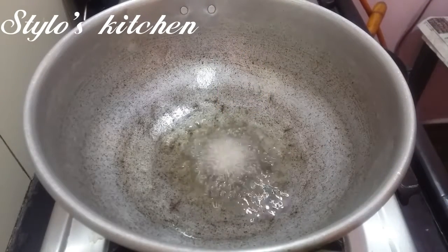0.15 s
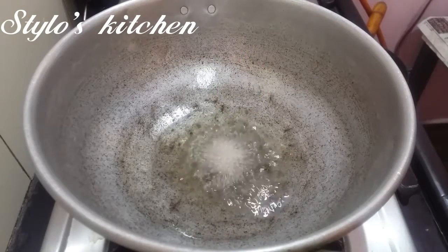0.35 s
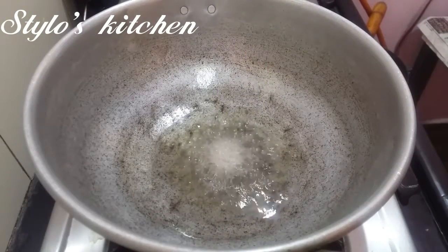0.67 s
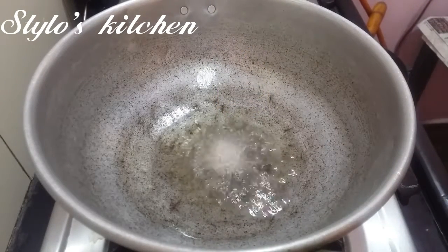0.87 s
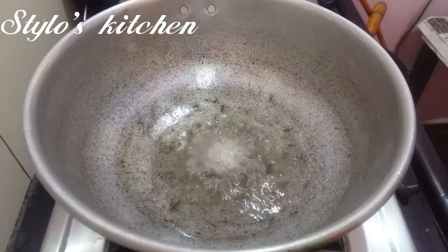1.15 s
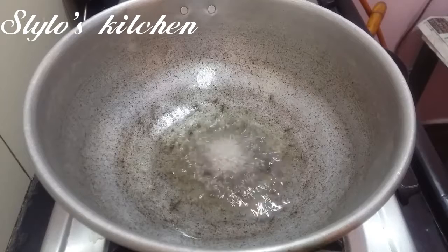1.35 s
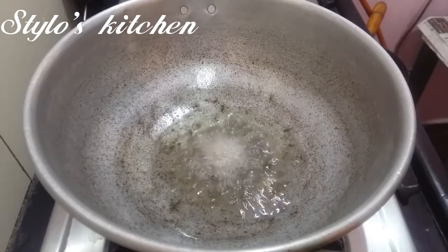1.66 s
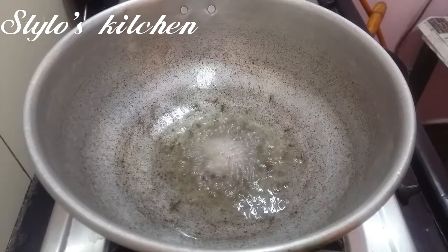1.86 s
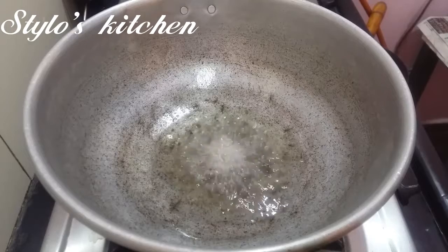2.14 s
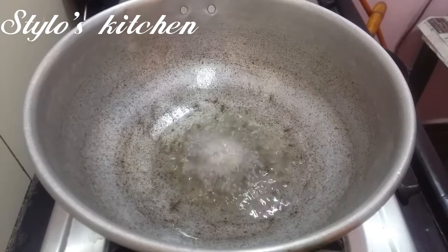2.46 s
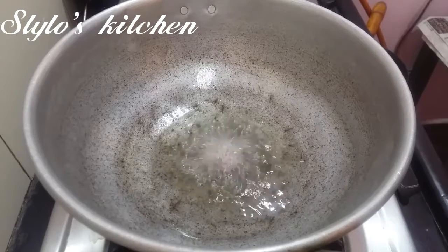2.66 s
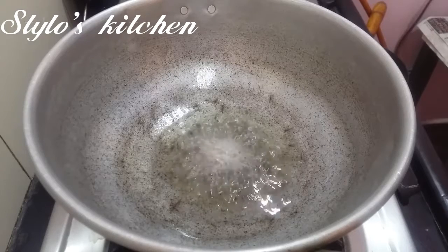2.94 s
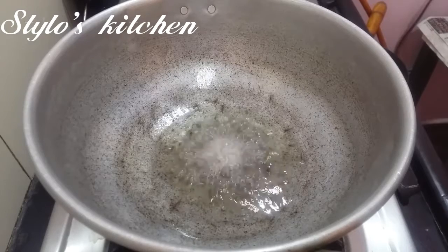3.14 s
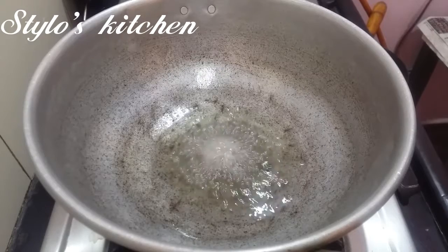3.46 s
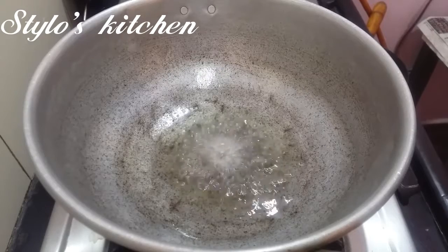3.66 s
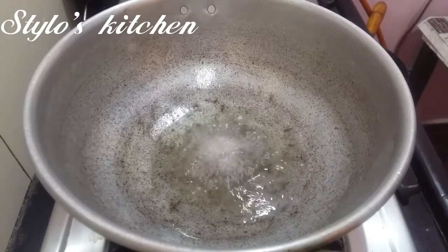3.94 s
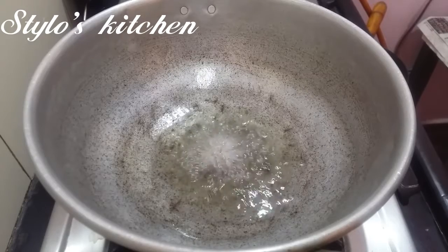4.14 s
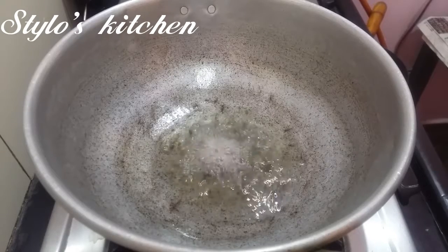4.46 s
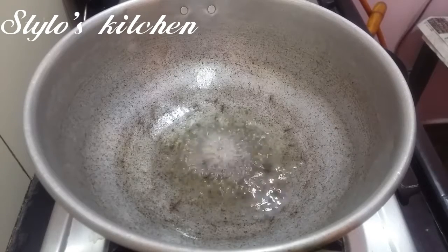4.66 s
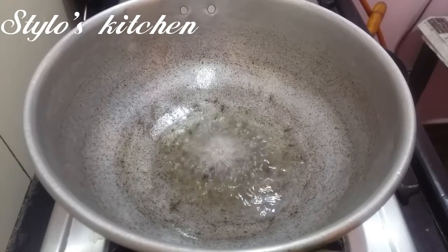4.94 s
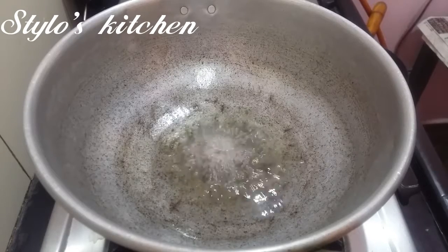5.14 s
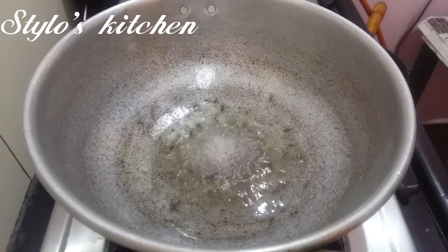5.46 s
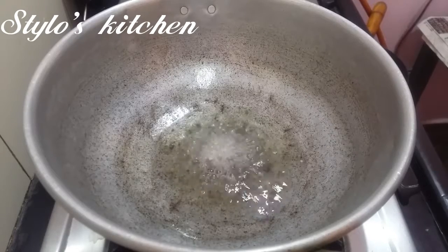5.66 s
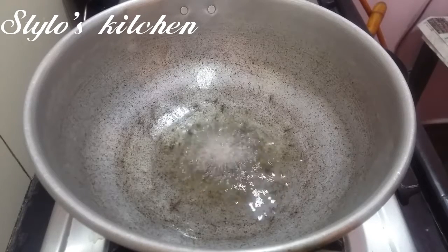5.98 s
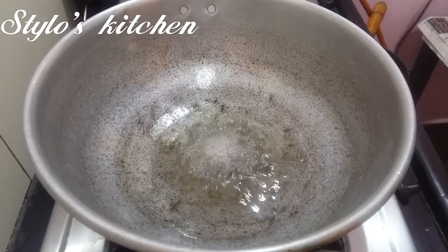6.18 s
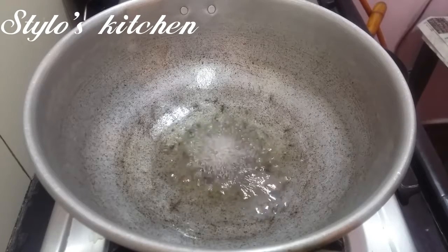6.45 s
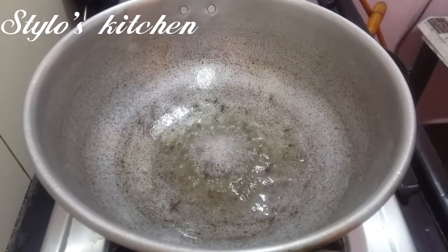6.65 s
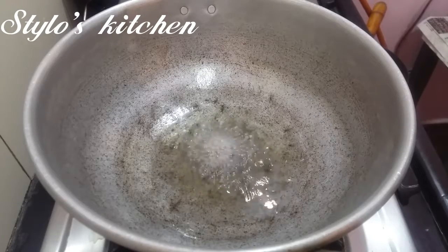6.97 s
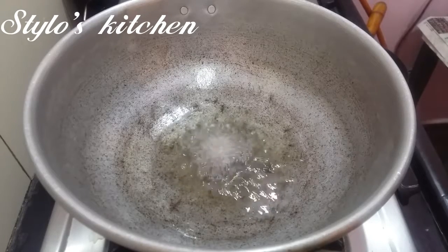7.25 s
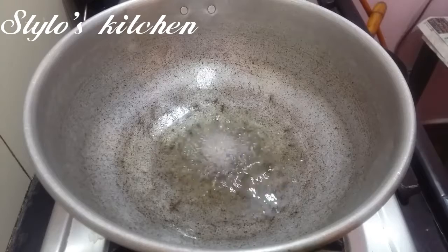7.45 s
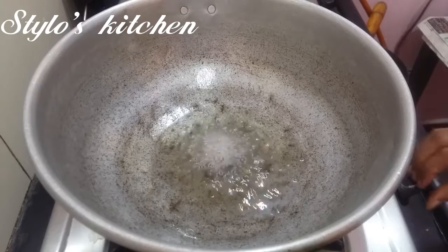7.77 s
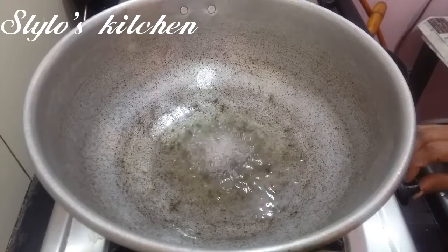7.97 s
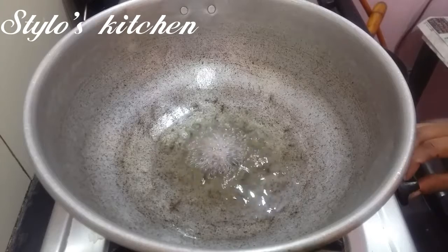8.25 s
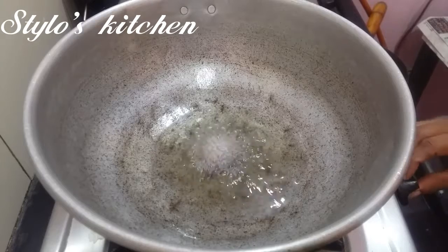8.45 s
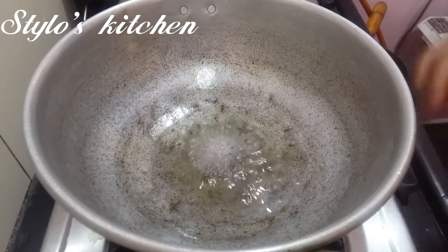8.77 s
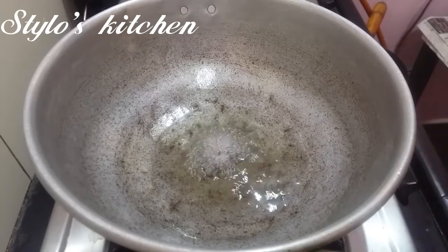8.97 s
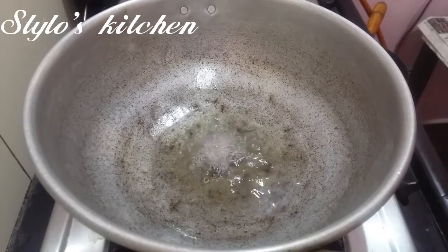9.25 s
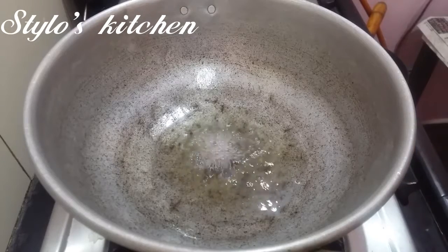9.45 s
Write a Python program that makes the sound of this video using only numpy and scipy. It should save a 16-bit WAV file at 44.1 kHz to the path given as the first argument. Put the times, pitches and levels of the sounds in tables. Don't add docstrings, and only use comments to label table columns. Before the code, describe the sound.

Close-up frying hiss and snapping seed bursts ring in a metal pan, then the sizzle dies away, leaving isolated crackles and a few soft stove knocks.

```python
import sys
import numpy as np
from scipy import signal
from scipy.fft import rfft, irfft, next_fast_len
from scipy.io import wavfile
from scipy.ndimage import uniform_filter1d

SR = 44100
rng = np.random.default_rng(int(sys.argv[2]) if len(sys.argv) > 2 else 0)


def materialize(psi):
    bounded = np.clip(np.atleast_2d(psi).T, -1, 1)
    quanta = np.round(bounded * 32767).astype(np.int16)
    wavfile.write(sys.argv[1], SR, quanta)


def makeup_ratio(level_db):
    decades = np.asarray(level_db, float) / 20
    return 10 ** decades


N = 423801

# f/Hz, spectral level/dB
ROARING_MURMUR = [(15, -34), (25, -2), (27, -1), (103, 3.5), (586, -1), (814, -1.5), (1010, -5.5),
                  (2000, -3.5), (2600, -36), (4400, -120)]
# f/Hz, spectral level/dB
HUSHED_MURMUR = [(15, -46), (25, -16), (128, -3), (202, -6), (257, -6.5), (303, -4.5), (391, -8),
                 (2000, -14.5), (2600, -33), (4400, -120)]
# start t/s, end t/s, f/Hz, level/dB
BURNER_HUM = (7.5, 9.5, 171, -75)
# t/s, fizz level/dB
BOIL = [(0.0, -37), (0.3, -40), (0.56, -39), (1.1, -39), (1.31, -36.5), (1.58, -34.5), (1.93, -39.5),
        (2.14, -37), (2.6, -41), (2.9, -37.5), (3.45, -39), (4.31, -45), (4.92, -49), (6.45, -51.5),
        (6.82, -57), (7.7, -58.5), (8.7, -58.5), (9.61, -61)]
# level/dB at a boil of -50 dB, slope/(dB per dB of boil)
FOLLOW = dict(fizz=(-50.5, 1), murmur=(-62.5, 0.55), spray=(-57.5, 0.65))
# f/Hz, spectral level/dB
LIVELY_FIZZ = [(710, -32), (1200, -17), (1920, -22), (2230, -11), (2830, -10), (3160, -4), (3450, -5),
               (4310, 3.5), (5380, -3.5), (5820, -8.5), (6300, -11.5), (7050, -17.5), (8000, -18),
               (10400, -43), (17600, -120)]
# f/Hz, spectral level/dB
SETTLED_FIZZ = [(710, -46), (1200, -20), (1990, -14), (2110, -11), (2610, -6), (3040, -7.5), (3420, -4),
                (4040, -3), (4310, 2.5), (5730, -9.5), (8000, -18.5), (10400, -51), (17600, -120)]
# f/Hz, spectral level/dB
SPRAY = [(3820, -17), (6500, -16), (7200, -11), (8300, -3.5), (10300, -6), (15100, -7), (15800, -11),
         (15950, -48)]
# start t/s, end t/s, level/dB
LULLS = [
    (4.9, 5.95, -1.5),
    (7.75, 8.55, -1),
]
# start t/s, end t/s, low f/Hz, high f/Hz, level/dB
VENTS = [
    (.45, 1.498, 5130, 6630, -48),
    (2.609, 3.1, 4900, 6000, -53),
]
# t/s, peak level/dB, f/Hz, decay time T60/s
KNOCKS = [(1.234, -37, 750, 0.22), (1.261, -49, 616, 0.11), (1.319, -41.5, 780, 0.13),
          (1.515, -34.5, 630, 0.22), (5.213, -51, 850, 0.17), (5.233, -47.5, 790, 0.2),
          (5.264, -53, 797, 0.12), (5.637, -43.5, 292, 0.12), (7.951, -52, 390, 0.11),
          (7.994, -54, 297, 0.21), (8.752, -54.5, 268, 0.23), (8.799, -53, 444, 0.18)]
# t/s, level/dB, direction (sign)
PUFFS = [
    (1.4185, -27, -1),
    (1.963, -29, 1),
    (2.729, -34, -1),
    (3.223, -51, 1),
    (5.973, -45, -1),
    (6.419, -58, 1),
    (7.096, -52, 1),
    (7.470, -48, 1),
]
# t/s, level/dB, f/Hz, decay time T60/s
WALL_RINGS = [(.315, -42, 6150, .15), (.501, -36, 1790, 0.067), (1.13, -32, 1235, 0.04),
              (1.4175, -2.5, 4110, 0.016), (1.416, -24.5, 2345, 0.055), (3.942, -33, 703, 0.044),
              (7.468, -51.5, 493, 0.05), (5.971, -30, 4240, 0.14), (1.9625, -6, 4080, 0.033),
              (1.962, -19.5, 347, 0.019), (2.716, -20.5, 1830, 0.072), (2.717, -12, 3200, 0.035),
              (3.2225, -6, 3320, 0.0062), (3.309, -14.5, 3160, 0.011), (3.309, -17.5, 4820, .015),
              (3.76, -51, 1640, 0.32), (5.235, -52, 1385, 0.25), (5.97, -39.5, 1610, 0.2),
              (6.417, -28.5, 3660, 0.23), (6.418, -20.5, 4300, 0.079), (6.418, -36.5, 480, 0.035),
              (6.419, -47.5, 225, .15), (6.417, -25.5, 5290, 0.1), (6.417, -38, 2680, 0.15),
              (7.094, -38, 2530, 0.2), (7.094, -45, 2020, .23), (7.094, -28, 3920, 0.037),
              (7.468, -35.5, 2700, 0.097), (8.77, -53, 2620, 0.17)]
# delay t/s, level/dB
WALL_ECHOES = [
    (.0108, -15),
    (.0135, -16),
    (.019, -20),
]
# f/Hz, width/Hz
CAVITY = (667, 535)
# f/Hz, width/Hz, level/dB
PRESENCE = [(3610, 670, 15), (4186, 1380, 26.5), (4630, 610, -33)]
KITCHEN_T60 = dict(crack=0.42, spray=0.45, edge=0.35, shell=0.32, husk=0.37, cavity=0.36, boom=0.18)
# t/s, shell peak level/dB, relative to it husk level/dB, pan cavity level/dB
SPLATS = [(0.2257, -44, -17, -3), (0.5009, -31, -22, -34), (1.1298, -33.5, 0, -3), (1.9232, -31, -11, -27),
          (2.153, -39, -4, -11), (2.1935, -37, -4, -4.5), (2.6244, -40.5, -4, -20),
          (3.055, -31.5, -2, -8.5), (3.7004, -47, -20, -20), (4.7037, -49, 3, -18), (5.4984, -46, -17, -19)]
# t/s, shell (2-3.3 kHz) peak level/dB,
# relative to it husk (1-2 kHz) level/dB, pan cavity level/dB, kitchen echo level/dB
THUDS = [(0.0004, -21, -2, -11, -4.5), (1.4148, -17.5, -6.5, -7.5, -9.5), (1.9602, -13, -3.5, -8, -12),
         (2.4401, -30, -4.5, -2, -9.5), (2.7159, -13.5, -4.5, -9, -7.5), (2.7274, -15, -11, -24, -10.5),
         (3.2213, -27.5, -25, 2, -13.5), (3.3084, -22.5, -27, -4.5, -7), (3.9407, -24, 1.5, -3.5, -10),
         (5.9707, -23.5, -1.5, -8.5, -11), (6.4153, -32, -6.5, -10, -2.5), (7.0924, -26.5, -11.5, -13, -8),
         (7.4664, -25.5, -9, -16.5, -9)]
# t/s, peak level/dB
TICKS = [(0.225, -39), (0.502, -28), (1.13, -22), (1.3616, -28), (1.5723, -40), (1.7704, -34), (2.152, -26),
         (2.195, -31), (2.6618, -30), (2.996, -30), (3.061, -36), (3.296, -29), (3.766, -27), (4.2188, -34),
         (4.7735, -32), (4.923, -43), (5.2045, -34.5)]
TICK = dict(length_ms=2.3, echo_db=-9.5, spray_db=-34, edge_db=-35)
# t/s, peak level/dB, burst length/ms, kitchen echo level/dB,
# edge (5-7 kHz) level/dB
CRACKS = [(0.001, -16, 6.8, -8, -21), (1.4157, -5.5, 2.2, -14.5, -5), (1.961, 2.5, 2.26, -18, -6),
          (2.4415, -22, 2.8, -5.5, -25), (2.7162, -12, 5.8, -3.5, -13), (2.7273, -4, 2, -28, -30),
          (3.222, -10, 0.99, -16.5, -17), (3.3084, -20.5, 1.3, -6.5, -18), (3.942, -21, 5.6, -12, -23),
          (5.97, -16.5, 3.7, -10.5, -23), (6.4155, -16.5, 6.7, -7, -24), (7.0933, -29, 6.6, -6.5, -33),
          (7.4665, -23, 3.4, -9, -38)]
# f/Hz, spectral level/dB
PARTING = [(18, -39), (30, -8), (537, -4), (3190, -3), (3640, -19), (4860, -1), (15800, -11)]


def evened(x):
    return x / np.sqrt(np.mean(x ** 2) + 1e-20)


def read(points, hz):
    f, value = np.transpose(points)
    return np.interp(np.log(hz + 1), np.log(f + 1), value)


def add(mix, s, sound):
    part = mix[max(round(s * SR), 0):][:len(sound)]
    part += sound[:len(part)]


def resonate(x, hz, width):
    return signal.lfilter(*signal.iirpeak(hz, hz / width, SR), x)


def band(x, lo_hz, hi_hz):
    sos = signal.butter(4, [lo_hz, min(hi_hz, 16000)], "band", fs=SR, output="sos")
    return signal.sosfilt(sos, x)


def coloured(x, spectrum):
    size = next_fast_len(N)
    gain = makeup_ratio(read(spectrum, np.fft.rfftfreq(size, 1 / SR)))
    return evened(irfft(rfft(x, size) * gain, size)[:N])


def patchy(patchy_db, flicker_db):
    a, b, patches = rng.standard_normal((N // 128 + 5, 257, 3)).T
    flicker = evened(uniform_filter1d(patches[0], size=6))
    patches = uniform_filter1d(patches, size=8, axis=0)
    patches = evened(uniform_filter1d(patches, size=20, axis=1))
    z = (a + 1j * b) * makeup_ratio(patchy_db * patches + flicker_db * flicker)
    return evened(signal.istft(z, nperseg=512, noverlap=384)[1][:N])


def level(layer):
    base_db, slope = FOLLOW[layer]
    s, boil_db = np.transpose(BOIL)
    return makeup_ratio(base_db + slope * (np.interp(np.arange(N) / SR, s, boil_db) + 50))


def settling(early, late):
    settled = np.clip((np.arange(N) / SR - 4.5) / 3.4, 0, 1)
    return (1 - settled) * early + settled * late


def murmur():
    rumble = patchy(patchy_db=.5, flicker_db=.1)
    shaped = settling(coloured(rumble, ROARING_MURMUR), coloured(rumble, HUSHED_MURMUR))
    return makeup_ratio(2.14) * level("murmur") * shaped


def hum(start, end, hz, db):
    t = np.arange(0, end - start, 1 / SR)
    return makeup_ratio(db) * np.sin(2 * np.pi * hz * t) * signal.windows.tukey(len(t), .5)


def bubbles(per_s, spread_db):
    size = makeup_ratio(spread_db * np.minimum(rng.exponential(1, N), 5)) * rng.choice([-1., 1.], N)
    return evened(size * (rng.random(N) < per_s / SR))


def singing(per_s, width, count):
    size = makeup_ratio(2.5 * np.minimum(rng.exponential(1, N), 3)) * (rng.random(N) < per_s / SR)
    kind = rng.integers(0, count, N)
    pitches = np.linspace(900, 7000, count) + rng.uniform(-65, 66, count)
    return evened(sum(resonate(size * (kind == k), hz, width) for k, hz in enumerate(pitches)))


def in_pan(x, echo_db):
    taps = makeup_ratio(echo_db) * rng.standard_normal(1500) * (rng.random(1500) < .04)
    taps[:400] = 0
    taps[0] = 1
    return signal.oaconvolve(x, taps)[:N]


def thinning():
    t = np.arange(N) / SR
    dips_db = sum(db * ((t > a) & (t < b)) for a, b, db in LULLS)
    return makeup_ratio(uniform_filter1d(dips_db, size=2000))


def spray(bursts):
    drive = 0.51 * bursts + patchy(patchy_db=0.1, flicker_db=0.3)
    return makeup_ratio(-5.0) * level("spray") * thinning() * coloured(drive, SPRAY)


def fizz(bursts):
    ringing = singing(per_s=2000, width=52, count=48)
    drive = 0.56 * bursts + 0.47 * ringing + patchy(patchy_db=-1.5, flicker_db=1.27)
    drive = in_pan(drive, echo_db=-27)
    shaped = settling(coloured(drive, LIVELY_FIZZ), coloured(drive, SETTLED_FIZZ))
    return makeup_ratio(0.5) * level("fizz") * shaped


def vent(start, end, lo_hz, hi_hz, db):
    jet = evened(band(rng.standard_normal(round((end - start) * SR)), lo_hz, hi_hz))
    return makeup_ratio(db) * jet * signal.windows.tukey(len(jet), .6)


def knock(db, hz, t60, chance):
    t = np.arange(len(chance)) / SR
    width = 0.39 * hz
    hollow = evened(band(resonate(chance[:, 0], hz, width), hz - width, hz + 0.82 * width))
    return makeup_ratio(db - 1.0) * hollow * (1 - np.exp(-t / 0.0011)) * makeup_ratio(-60 * t / t60)


def puff(db, direction, chance):
    u = np.arange(len(chance)) / SR / 0.00078
    push = np.e * u * np.exp(-u) - 0.15 * (u / 4) * np.exp(1 - u / 4)
    return makeup_ratio(db) * np.sign(direction) * push


def ring(db, hz, t60, chance):
    t = np.arange(len(chance)) / SR
    drift = evened(uniform_filter1d(chance[:, 0], size=300))
    waver = 1 + .6 * (1 - np.exp(-t / .02)) * drift
    return makeup_ratio(db - 60 * t / t60) * (1 - np.exp(-t / 0.00029)) * waver * np.sin(2 * np.pi * hz * t)


def burst(length_ms, echo_db, chance, layers):
    t = np.arange(len(chance)) / SR
    start = t[:1200]
    u = start / (np.clip(length_ms, .5, 6) / 1000)
    tear = chance[:1200, 0] * (1 - np.exp(-start / .0003)) * np.exp(-u ** 2)
    early = np.zeros(len(t))
    add(early, 0, tear)
    smeared = np.exp(-(start / 0.0026) ** 2) * chance[1200:2400, 0]
    for delay, wall_db in WALL_ECHOES:
        add(early, delay, makeup_ratio(wall_db) * smeared)
    out = np.zeros(len(t))
    for colour, db, t60 in layers:
        direct = colour(early)
        decay = makeup_ratio(-60 * t / t60) + makeup_ratio(2 - 60 * t / 0.02)
        tail = evened(colour(chance[:, 1])) * (1 - np.exp(-t / 0.0045)) * decay
        out += makeup_ratio(db) * (direct / abs(direct).max() + makeup_ratio(echo_db - 7) * tail)
    return out


def body(db, husk_db, cavity_db, echo_db, chance):
    boom_db = -32.5 + 11.5
    return makeup_ratio(db) * burst(1.92, echo_db, chance, [
        (lambda x: band(x, 2064, 3140), 0, KITCHEN_T60["shell"]),
        (lambda x: band(x, 1090, 1937), husk_db, KITCHEN_T60["husk"]),
        (lambda x: resonate(resonate(x, *CAVITY), *CAVITY), cavity_db, KITCHEN_T60["cavity"]),
        (lambda x: resonate(resonate(x, 334, 200), 323, 210), boom_db, KITCHEN_T60["boom"])])


def splat(db, husk_db, cavity_db, chance):
    return body(db, husk_db, cavity_db, echo_db=-5.5, chance=chance)


def thud(db, husk_db, cavity_db, echo_db, chance):
    return body(db, husk_db, cavity_db, echo_db, chance)


def presence(x):
    return sum(makeup_ratio(db) * resonate(resonate(x, hz, width), hz, width) for hz, width, db in PRESENCE)


def pop(db, length_ms, echo_db, spray_db, edge_db, chance):
    return makeup_ratio(db) * burst(length_ms, echo_db, chance, [
        (presence, 0, KITCHEN_T60["crack"]),
        (lambda x: band(x, 4940, 6360), edge_db, KITCHEN_T60["edge"]),
        (lambda x: band(resonate(x, 6800, 3300), 8500, 21000), spray_db, KITCHEN_T60["spray"])])


def tick(db, chance):
    return pop(db, chance=chance, **TICK)


def crack(db, length_ms, echo_db, edge_db, chance):
    return pop(db, length_ms, echo_db, spray_db=-16.5, edge_db=edge_db, chance=chance)


def scene():
    bursts = bubbles(per_s=2500, spread_db=2.0)
    mix = fizz(bursts) + murmur() + spray(bursts)
    add(mix, BURNER_HUM[0], hum(*BURNER_HUM))
    for table, source in [(CRACKS, crack), (TICKS, tick), (THUDS, thud), (SPLATS, splat),
                          (WALL_RINGS, ring), (KNOCKS, knock), (PUFFS, puff)]:
        chances = rng.standard_normal((len(table), 14000, 2))
        for (s, *row), chance in zip(table, chances):
            add(mix, s, source(*row, chance))
    for row in VENTS:
        add(mix, row[0], vent(*row))
    return np.array([mix, mix])


def band_limit(x):
    return signal.sosfilt(signal.butter(12, 16520, fs=SR, output="sos"), x)


def record(dry):
    mono = np.tanh(dry[0] / 1.05) * 1.05
    mono = signal.oaconvolve(mono, signal.firwin(255, 16300, fs=SR), "same")
    quick, slow, medium = (abs(uniform_filter1d(mono ** 2, size=n)) for n in (256, 8192, 1024))
    sudden = uniform_filter1d(1. * (quick > 5 * slow), size=2600, origin=600) > 1e-6
    side = makeup_ratio(-30.5) * sudden * np.sqrt(medium) * coloured(rng.standard_normal(N), PARTING)
    offset = -.0007
    return band_limit(np.array([mono + side, mono - side]) + offset)


dry = scene()
out = record(dry)
materialize(out)
```